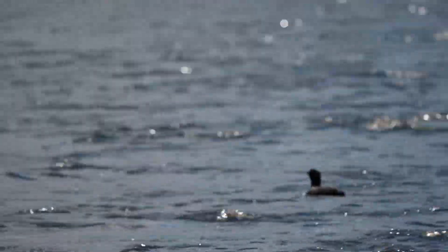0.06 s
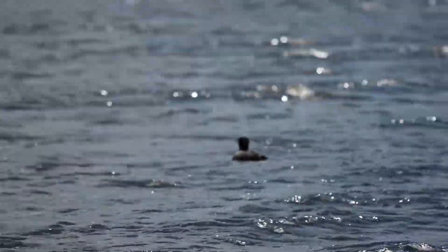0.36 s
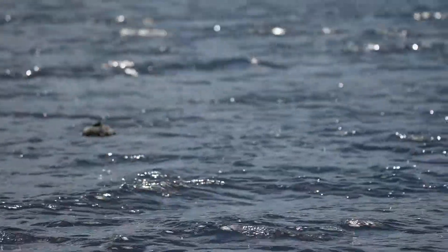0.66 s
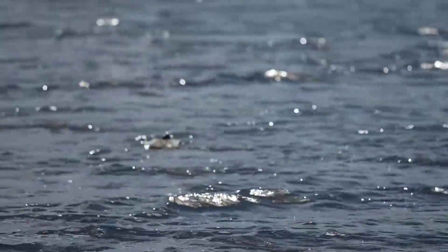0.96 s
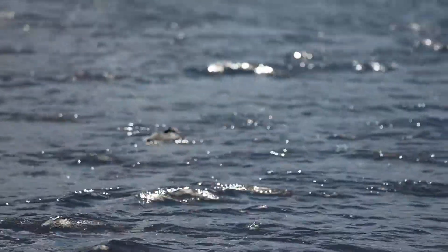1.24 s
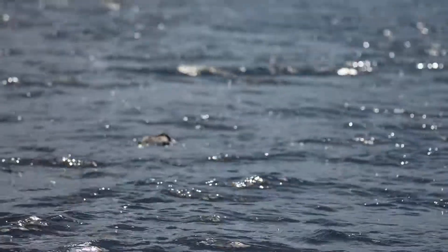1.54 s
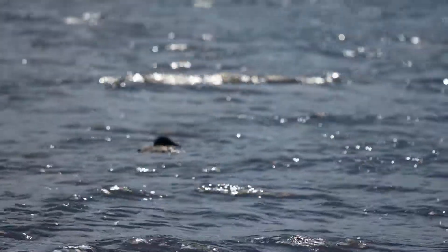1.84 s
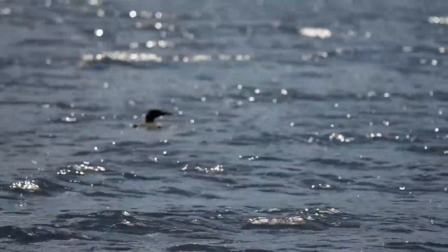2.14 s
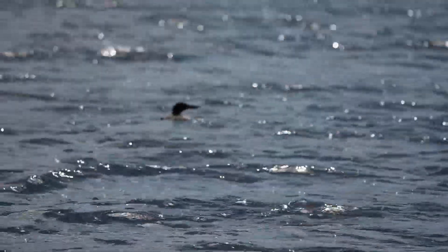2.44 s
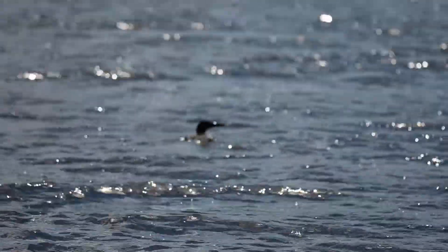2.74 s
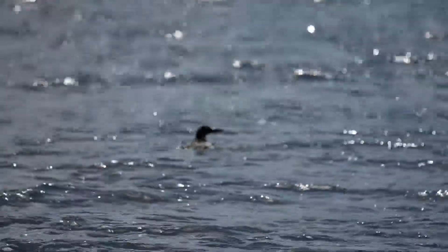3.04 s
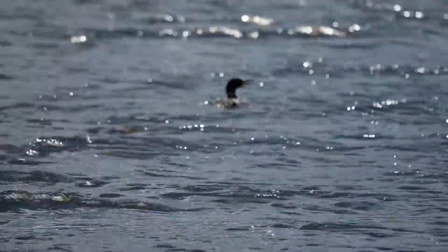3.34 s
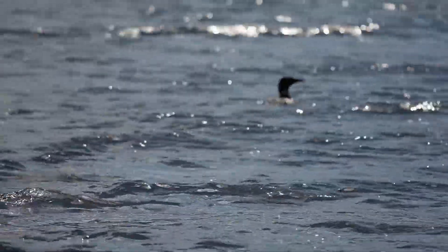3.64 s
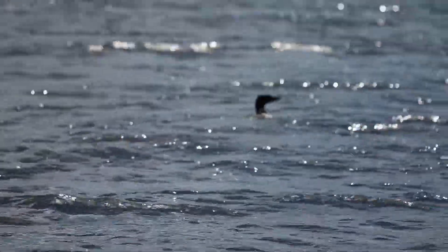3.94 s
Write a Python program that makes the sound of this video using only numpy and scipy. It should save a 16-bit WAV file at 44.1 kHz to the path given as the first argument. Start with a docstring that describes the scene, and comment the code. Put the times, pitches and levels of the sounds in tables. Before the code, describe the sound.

A loon gives one short wavering call across a lake, from about 3.3 to 3.9 seconds, in four quick swings. Wind rumbles on the microphone throughout, mostly on the right, with crackling thumps near 2.1 and 3.3 seconds. A small bird whistles a falling note around 1 second and faintly again at 3.8. Distant wavelets and thin hiss lie underneath, with a sharp tick near 2.9.

```python
"""A loon gives one short tremolo across a choppy lake, its low voice breaking up into four swings.
A small bird whistles earlier and again, faintly, after it; waves and shore scatter both voices.
Far off, wavelets wash and something taps once. At the microphone, wind eddies hit the two ports
separately, and the strongest overload the right one. The camera itself adds hiss, thin whines,
lens motor twitches and a few ticks."""
import sys
import numpy as np
from scipy import signal
from scipy.fft import rfft, irfft
from scipy.io import wavfile
from scipy.ndimage import uniform_filter1d

SR = 44100
rng = np.random.default_rng(int(sys.argv[2]) if len(sys.argv) > 2 else 0)


def file_out(sig):
    """Save sig as 16-bit WAV at sys.argv[1]."""
    # one column per channel
    cols = np.atleast_2d(sig).T
    # limit, then scale
    lim = np.clip(cols, -1, 1)
    pcm = np.round(lim * 32767).astype(np.int16)
    wavfile.write(sys.argv[1], SR, pcm)


N = 176400
TIME = np.arange(N) / SR
FREQ = np.fft.rfftfreq(N, 1 / SR)

# far wash of the lake (f/Hz, relative level/dB)
WASH_SPECTRUM = [(100, -0.5), (500, 3), (1000, -3), (2000, -14), (3200, -20.5), (4500, -22), (6500, -31),
                 (12000, -41), (16000, -49.5)]
# camera hiss (f/Hz, left relative level/dB, right relative level/dB)
HISS_SPECTRUM = [(2980, -20, -14), (6040, -11, -11.5), (8760, 1.5, -11), (10200, -4.5, -12),
                 (10800, -1, -15), (11900, -3, -16.5), (12600, -17, -18), (15500, -14, -21)]
# camera whines (f/Hz, left level/dB, start t/s, end t/s, right gain/dB)
WHINES = [(8600, -75, 0, 3, -12), (10570, -64.5, 0.038, 1.33, -22), (11806, -76, 0, 4.8, -14),
          (15735, -87, 0.21, 3.6, -11.5), (5280, -67.5, 1.67, 1.79, -6)]
# lens motor twitches (t/s, level/dB)
LENS_TWITCHES = [(.21, -48), (1.209, -49), (1.71, -48.5), (2.22, -49.5), (2.74, -49), (3.713, -46.5)]
# resonances of the lens motor (f/Hz, gain/dB)
LENS_MODES = [(8480, -9.5), (10600, -7), (12650, -19)]
# ticks on the camera body (t/s, level before filtering/dB)
BODY_TICKS = [(.066, -28.5), (2.936, -10.5), (3.936, -26)]
# steady breeze at each port (t/s, level/dB)
BREEZE_LEFT = [(0, -45), (.25, -32), (.75, -30), (1.5, -29), (1.85, -35), (2.1, -26), (2.5, -30.5),
               (2.8, -30.5), (3.2, -25), (3.6, -35), (4, -27)]
BREEZE_RIGHT = [(0, -31), (.7, -23), (.95, -25.5), (1.4, -27), (1.72, -21.5), (1.88, -31), (2.2, -20.5),
                (2.5, -23), (2.8, -25), (3.1, -19), (3.45, -22), (3.75, -21), (4, -31.5)]
# wind buffets on the microphone (start t/s, length/s, level/dB, port)
BUFFETS = [(0.137, 0.02, -19.5, "right"), (0.359, 0.017, -11, "right"), (.535, 0.011, -12.5, "right"),
           (0.542, 0.051, -19, "left"), (0.633, 0.03, -11.5, "right"), (0.692, .016, -12, "right"),
           (0.716, 0.03, -8, "right"), (0.786, .007, -14, "right"), (0.919, 0.0042, -12, "left"),
           (1.01, 0.0049, -11, "right"), (1.03, 0.0095, -14, "left"), (1.109, 0.034, -10, "right"),
           (1.12, 0.024, -18.5, "left"), (1.511, 0.026, -16, "left"), (1.663, 0.019, -11, "right"),
           (1.798, 0.0084, -13.5, "right"), (2.09, 0.028, -1.5, "right"), (2.127, .014, 3.5, "right"),
           (2.162, 0.0085, -3.5, "right"), (2.226, 0.039, -19, "right"), (2.355, 0.016, -9.5, "right"),
           (2.388, 0.0058, -11.5, "right"), (2.44, 0.0034, -10.5, "left"), (2.483, 0.027, -16.5, "left"),
           (2.58, 0.013, -14.5, "right"), (3.071, 0.03, -11, "right"), (3.123, 0.018, -14.5, "left"),
           (3.259, 0.0025, -9, "right"), (3.309, 0.0076, -8.5, "left"), (3.325, 0.012, 3, "right"),
           (3.343, .014, 8, "right"), (3.355, 0.072, -5.5, "right"), (3.71, 0.048, -13.5, "right")]
# eddy sizes, large to small (f/Hz, relative level/dB, growth/dB per dB of wind)
EDDY_BANDS = [(20.2, -6.5, 0.3), (44.8, 0, .5), (79.7, 6.5, 0.8), (187.5, 3.5, 1.21), (376, -9.5, 1.43),
              (634, -21.5, 1.62), (1454, -57.5, 2.5), (2960, -69.5, 2), (5560, -80, 1.48)]
# single large eddies on the right port (t/s, peak level/dB, f/Hz)
EDDY_SLAPS = [(0.359, -4.5, 376), (0.708, -0.5, 244), (0.7219, -6.5, 380), (0.745, 3.5, 308),
              (.808, -6, 300), (1.0168, -5, 336), (1.1144, 2.5, 462), (1.1206, 1, 300), (1.125, -.5, 334),
              (2.097, 3, 395), (2.1024, 5.5, 710), (2.109, 5.5, 400), (2.1305, 3.5, 328), (2.133, -1, 920),
              (2.138, 6, 610), (2.153, 3.5, 229), (2.17, -1, 222), (2.348, 5, 447), (2.3545, 3.5, 260),
              (2.9326, 2.5, 368), (3.1, -3.5, 440), (3.33, 3, 530), (3.342, 11, 440), (3.3508, 5.5, 890),
              (3.417, 4, 420), (3.43, 0, 300), (3.447, 0.5, 226)]
# small bird's first whistle and its fainter one (t/s, f/Hz, level/dB)
WHISTLE = [(.889, 6370, -34), (.896, 6050, -48), (.908, 4760, -36), (.912, 4360, -37), (.922, 4330, -33.5),
           (.96, 4293, -32), (1, 4223, -32.5), (1.06, 4191, -35), (1.12, 4100, -34.5), (1.147, 4060, -34),
           (1.183, 4070, -36), (1.197, 3820, -35)]
FAR_WHISTLE = [(3.8, 4210, -52), (3.85, 4097, -48), (3.93, 3890, -55.5), (3.995, 4000, -50)]
# breaks in the first whistle (t/s)
WHISTLE_BREAKS = [.91, .977, 1.004, 1.032, 1.058, 1.085, 1.11, 1.135]
# strength of the partials: small bird, loon's low voice, loon's high voice (f/Hz, gain/dB)
WHISTLE_VOICE = [(4000, -8), (6400, 0.5), (8000, -24), (8700, -34), (12200, -32), (13000, -47)]
LOW_VOICE = [(700, -2), (950, -1), (1450, -8), (1850, 3.5), (2400, -60), (3000, -32), (3600, -21),
             (4500, -36), (5400, -32.5), (6500, -34), (10500, -34)]
HIGH_VOICE = [(950, -5.5), (1350, 0), (2000, -34.5), (2600, -28.5), (3200, -30), (3900, -37.5), (4800, -34),
              (6200, -42), (7300, -55), (10500, -61)]
# loon's low notes before and after the tremolo (t/s, f/Hz, level/dB)
LOON_OPENING = [(3.265, 774, -41), (3.283, 851, -31.5), (3.3, 789, -30.5), (3.325, 734, -33),
                (3.345, 760, -33), (3.365, 899, -29.5), (3.385, 940, -29), (3.398, 950, -21)]
LOON_CLOSING = [(3.733, 694, -48), (3.745, 695, -37), (3.765, 719, -35.5), (3.79, 756, -32),
                (3.83, 693, -38), (3.855, 654, -43)]
# tops of the tremolo swings (t/s, f/Hz, level/dB)
TREMOLO_TOPS = [(3.384, 1351, -18.5), (3.476, 1287, -15), (3.577, 1263, -16), (3.679, 1208, -21.5)]


def amp(db):
    """Decibels to gain."""
    return 10 ** (np.asarray(db) / 20)


def unit(x):
    """Scales to rms 1."""
    return x / np.sqrt(np.mean(x ** 2) + 1e-20)


def gain_at(points, hz, column=1):
    """Gain of a dB spectrum, read on a log-frequency axis."""
    columns = np.transpose(points)
    return amp(np.interp(np.log(hz + 1), np.log(columns[0]), columns[column]))


def noise(gain):
    """Noise of rms 1 with the given spectrum."""
    return unit(irfft(rfft(rng.standard_normal(N)) * gain, N))


def wander(hz):
    """Random drift of rms 1, up to about the given rate."""
    return noise(1 / (1 + (FREQ / hz) ** 4))


def gate(start, end, edge):
    """1 between start and end, with soft edges."""
    return np.clip((TIME - start) / edge, 0, 1) * np.clip((end - TIME) / edge, 0, 1)


def decay(start, decay_s):
    """Jumps to 1 at start, then dies away."""
    return (TIME >= start) * np.exp(-np.minimum(abs(TIME - start) / decay_s, 20))


def arch(centre, half_s, squareness=2):
    """A smooth bump of height 1."""
    return np.exp(-np.minimum(abs((TIME - centre) / half_s) ** squareness, 20))


def place(x, right_db):
    """Mono to the two microphone ports."""
    return np.array([x, x * amp(right_db)])


def lake(level_db=-45):
    """Wavelets far out on the lake: a wash that swells gently at each port."""
    wash = gain_at(WASH_SPECTRUM, FREQ)
    return np.array([noise(wash) * amp(level_db + 2.8 * wander(1.65)) for _ in range(2)])


def distant_tap(level_db=-45, hz=2270):
    """One faint, dull tap some way off."""
    return amp(level_db) * decay(1.402, decay_s=0.0085) * noise(np.exp(-10 * (FREQ / hz - 1) ** 2))


def camera_hiss(left_db=-57, pulse_hz=59.94, pulse_depth=0.19):
    """The camera's own noise floor, pulsing quickly."""
    gains = [gain_at(HISS_SPECTRUM, FREQ, column) for column in (1, 2)]
    hiss = np.array([noise(g) * np.linalg.norm(g) / np.linalg.norm(gains[0]) for g in gains])
    return amp(left_db) * hiss * (1 + pulse_depth * np.cos(2 * np.pi * pulse_hz * TIME))


def camera_whine(drift_hz=6):
    """Thin, slightly unsteady tones from the camera, mostly on the left."""
    out = 0
    for hz, db, start, end, right_db in WHINES:
        tone = np.sin(2 * np.pi * np.cumsum(hz + drift_hz * wander(30)) / SR)
        out = out + place(np.sqrt(2) * amp(db) * gate(start, end, 0.01) * tone, right_db)
    return out


def lens_motor(twitch_s=0.026, half_width_hz=50):
    """Each twitch of the motor rings its narrow resonances."""
    ring = sum(amp(db) * noise(1 / (1 + ((FREQ - hz) / half_width_hz) ** 2)) for hz, db in LENS_MODES)
    return ring * sum(amp(db) * gate(s, s + twitch_s, 0.0037) for s, db in LENS_TWITCHES)


def body_ticks(band_hz=(5700, 9000)):
    """Sharp ticks on the camera body, right by the microphone."""
    envelope = sum(amp(db) * decay(s, decay_s=0.00066) for s, db in BODY_TICKS)
    snaps = rng.standard_normal(N) * envelope
    return signal.sosfilt(signal.butter(2, band_hz, "band", fs=SR, output="sos"), snaps)


def wind_strength(breeze, side, flutter_db=3, rise_s=0.00072, fall_s=0.011):
    """Wind at one port in dB: a fluttering breeze plus sudden buffets."""
    flutter = np.clip(wander(30.8), -2, 2)
    puffs = flutter + 0.11 * (flutter ** 2 - 1)  # puffs stand out more than lulls
    power = amp(np.interp(TIME, *np.transpose(breeze)) + flutter_db * puffs) ** 2
    for start, length, db, port in BUFFETS:
        if port == side:
            before = np.maximum(start - TIME, 0) / rise_s
            after = np.maximum(TIME - start - length, 0) / fall_s
            power += (amp(db) * np.exp(-np.minimum(before + after, 20))) ** 2
    return 10 * np.log10(power)


def wind(breeze, side, gain_db=-15.5, reference_db=-16.5):
    """Turbulence at one port: the harder the buffet, the more the small eddies grow."""
    excess_db = wind_strength(breeze, side) - reference_db
    band_hz, _, growths = np.transpose(EDDY_BANDS)
    eddies = noise(gain_at(EDDY_BANDS, FREQ) / (1 + (FREQ / band_hz[-1]) ** 2))
    local_power = uniform_filter1d(eddies ** 2, size=700)
    spectrum = rfft(unit(eddies / np.sqrt(local_power + 0.46)))  # evens out chance swells
    out = 0
    for hz, growth, pick in zip(band_hz, growths, np.eye(len(band_hz))):
        band = np.interp(np.log(FREQ + 1), np.log(band_hz), pick)
        limit_db = 5.5 + 25 * hz / 1000  # big eddies level off first
        out = out + irfft(spectrum * band, N) * amp(np.minimum(growth * excess_db, limit_db))
    return amp(gain_db) * out


def eddy_slaps():
    """Each large eddy is one push and pull of pressure on the port."""
    out = 0
    for s, db, hz in EDDY_SLAPS:
        offset_squared = np.minimum((np.pi * hz * (TIME - s)) ** 2, 20)
        out = out + amp(db) * (1 - 2 * offset_squared) * np.exp(-offset_squared)
    return out


def shore_echo(x, level_db=-24, low_t60_s=1.7, treble_t60_s=1):
    """Faint scattered echo off water and shore; the treble dies first."""
    t = TIME[:SR]
    taps = rng.standard_normal((2, SR)) * np.minimum(t / 0.017, 1)
    low = signal.sosfilt(signal.butter(2, 2500, fs=SR, output="sos"), taps)
    tail = low * amp(-60 * t / low_t60_s) + (taps - low) * amp(-60 * t / treble_t60_s)
    return amp(level_db) * signal.fftconvolve(x, tail / np.linalg.norm(tail[0]), axes=1)[:, :N]


def wave_scatter(x, gain_db=-2.5, above_hz=2890, decay_s=0.02):
    """Waves near the microphone scatter the treble into a short blur."""
    t = TIME[:SR // 10]
    taps = rng.standard_normal((2, len(t))) * np.exp(-t / decay_s)
    highpass = signal.butter(4, above_hz, "high", fs=SR, output="sos")
    taps = signal.sosfilt(highpass, taps / np.linalg.norm(taps[0]))
    return amp(gain_db) * signal.oaconvolve(x, taps, axes=1)[:, :N]


def voice(hz, level, colour, jitter=0.0039, jitter_hz=300, fading_db=5, fading_hz=25.5):
    """A bird's tone, purer when soft; its slightly hoarse overtones fade in and out over the water."""
    on = level > 0
    hz = (hz * (1 + jitter * wander(jitter_hz)))[on]
    phase = 2 * np.pi * np.cumsum(hz) / SR
    effort = (level[on] / level.max()) ** 0.46
    out = np.zeros(N)
    for k in range(1, 10):
        strength = effort if k > 1 else 1
        fading = amp(fading_db * wander(fading_hz)[on]) if k > 2 else 1
        hoarseness = 0.1 * (k - 1) * wander(jitter_hz)[on]
        timbre = gain_at(colour, k * hz) * (k * hz < colour[-1][0])
        out[on] += strength * fading * timbre * np.sin(k * phase + hoarseness)
    return np.sqrt(2) * out * level


def glide(curve, colour, dip_hz=0):
    """One bird note along a curve of pitch and level."""
    s, hz, db = np.transpose(curve)
    pitch = uniform_filter1d(np.interp(TIME, s, hz), size=300) - dip_hz
    level = amp(np.interp(TIME, s, db)) * gate(s[0], s[-1], 0.0099)
    return voice(pitch, level, colour)


def small_bird(dip_hz=430, break_s=0.0035, falter_depth=0.45):
    """A high whistle swoops down, dipping in pitch and level at each break; a fainter one comes later."""
    dips = dip_hz * sum(decay(s, break_s) for s in WHISTLE_BREAKS)
    falter = 1 - falter_depth * sum(arch(s, break_s) for s in WHISTLE_BREAKS)
    first = falter * glide(WHISTLE, WHISTLE_VOICE, dips)
    return place(first + glide(FAR_WHISTLE, WHISTLE_VOICE), right_db=-8)


def loon(trough_hz=975, trough_db=-8, rasp_db=-41.5, rasp_hz=7700, rasp_width_hz=2400):
    """Across the water, the low voice breaks up into a tremolo, louder at each top, then drops back."""
    top_s, top_hz, top_db = np.transpose(TREMOLO_TOPS)
    swings = [arch(s, half_s=0.028, squareness=2.76) for s in top_s]
    pitch = trough_hz + sum(swing * (hz - trough_hz) for swing, hz in zip(swings, top_hz))
    level_db = np.interp(TIME, top_s, top_db) + trough_db * (1 - sum(swings))
    level = amp(level_db) * gate(start=3.393, end=3.738, edge=0.0099)
    rasp = amp(rasp_db) * level * noise(np.exp(-((FREQ - rasp_hz) / rasp_width_hz) ** 2))
    opening = glide(LOON_OPENING, LOW_VOICE)
    tremolo = voice(pitch, level, HIGH_VOICE) + rasp
    closing = glide(LOON_CLOSING, LOW_VOICE)
    return place(opening + tremolo + closing, right_db=0.5)


def scene():
    """Birds over the lake, with camera noise and wind right at the microphone."""
    call, whistle = loon(), small_bird()
    direct = call + whistle
    birds = direct + wave_scatter(direct) + shore_echo(call + amp(9) * whistle)
    background = lake() + distant_tap()
    camera = camera_hiss() + camera_whine() + place(lens_motor() + body_ticks(), right_db=-31)
    ports = np.array([wind(BREEZE_LEFT, "left"), wind(BREEZE_RIGHT, "right") + eddy_slaps()])
    return birds + background + camera + ports


def record(dry, edge_hz=16100):
    """The input clips hard at full scale, so strong buffets crackle; then the top treble is cut."""
    lowpass = signal.firwin(401, edge_hz, window=("kaiser", 9), fs=SR)
    return signal.oaconvolve(np.clip(dry, -1, 1), lowpass[None], "same")


dry = scene()
out = record(dry)
file_out(out)
```